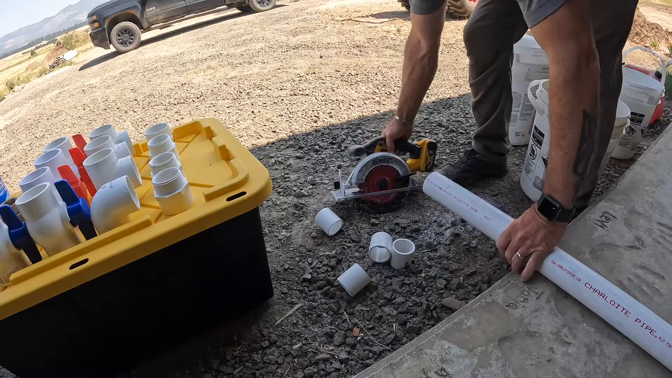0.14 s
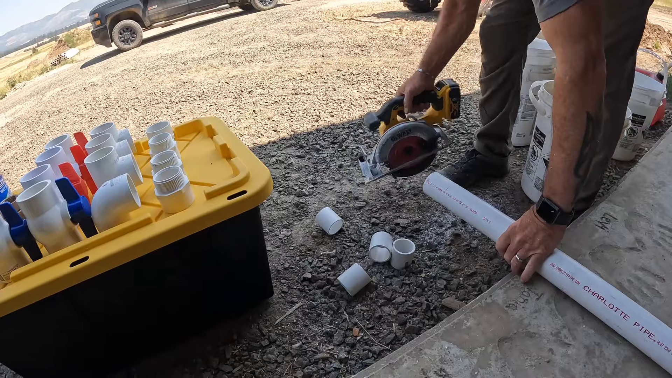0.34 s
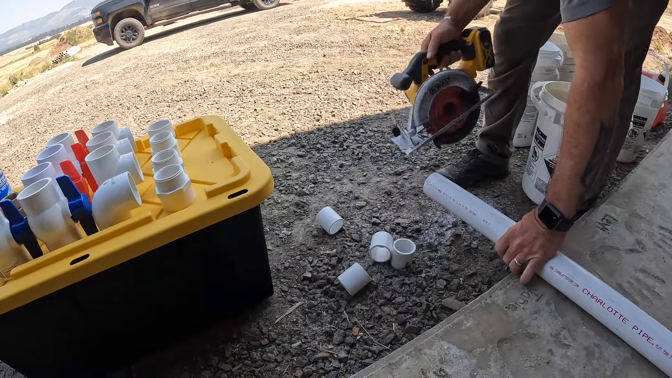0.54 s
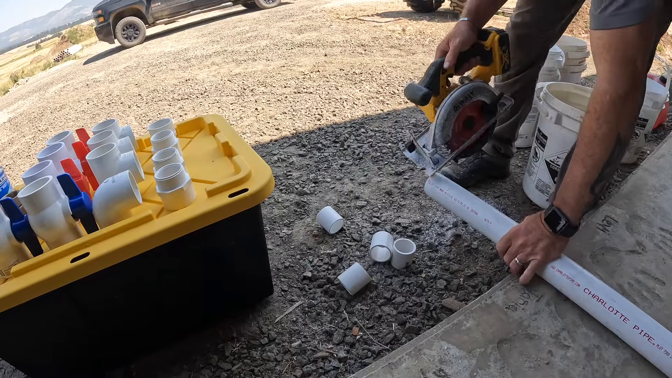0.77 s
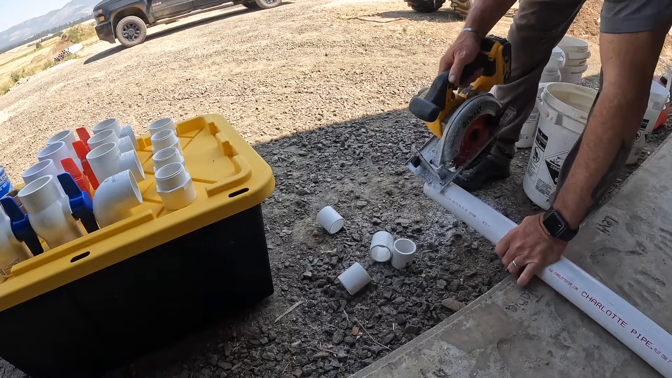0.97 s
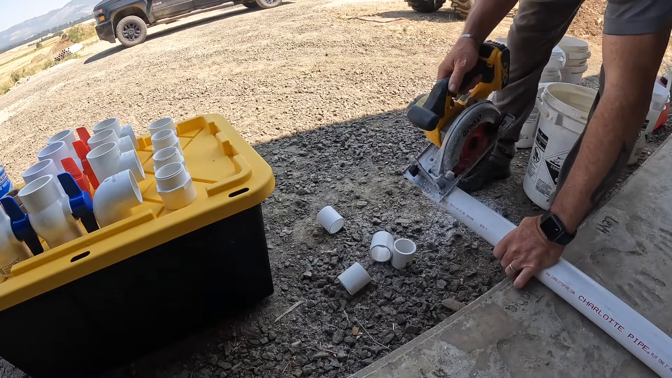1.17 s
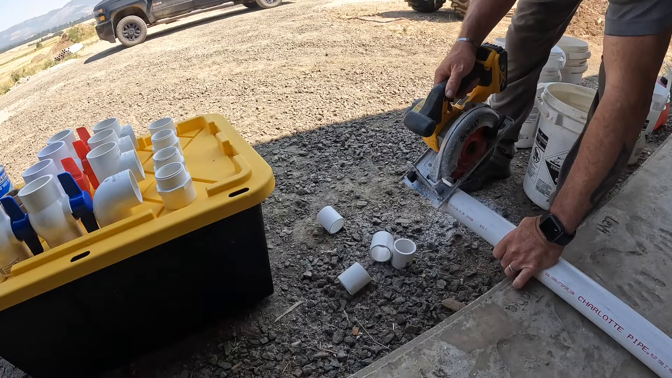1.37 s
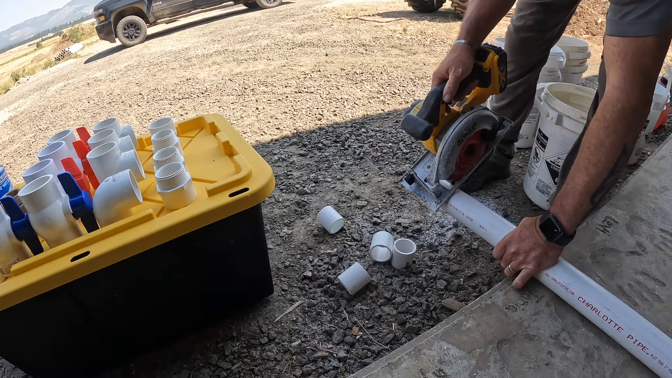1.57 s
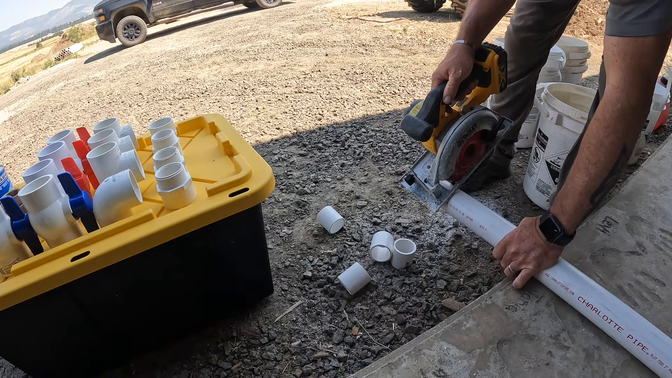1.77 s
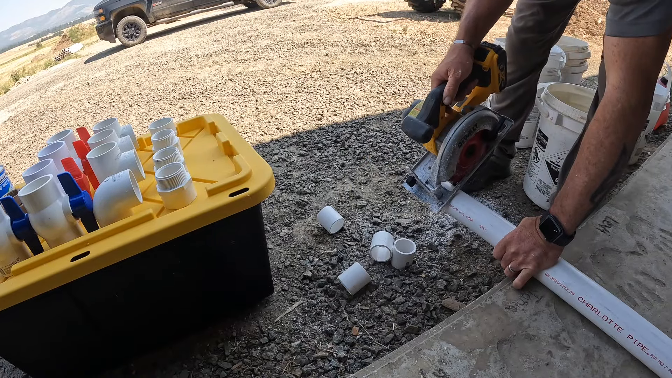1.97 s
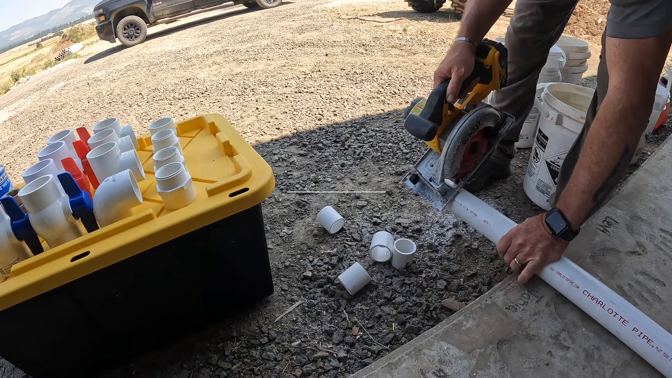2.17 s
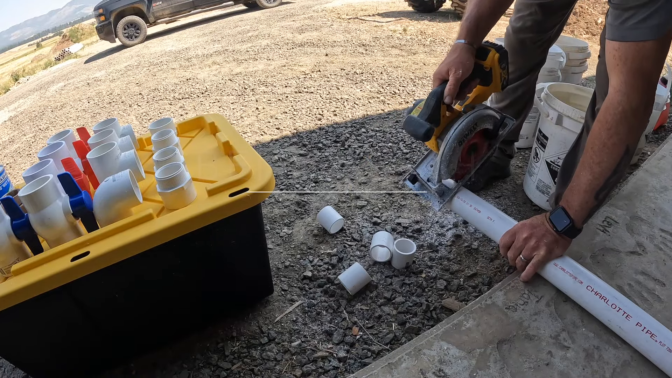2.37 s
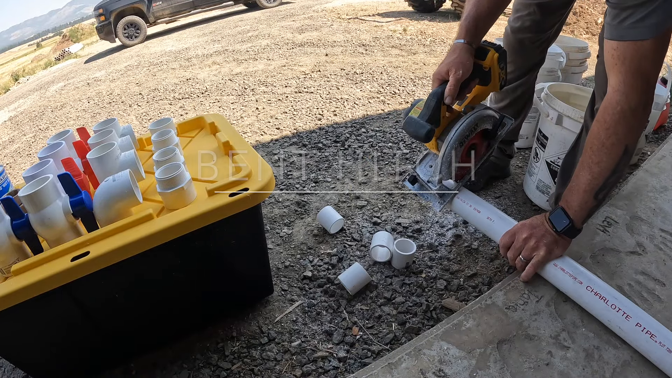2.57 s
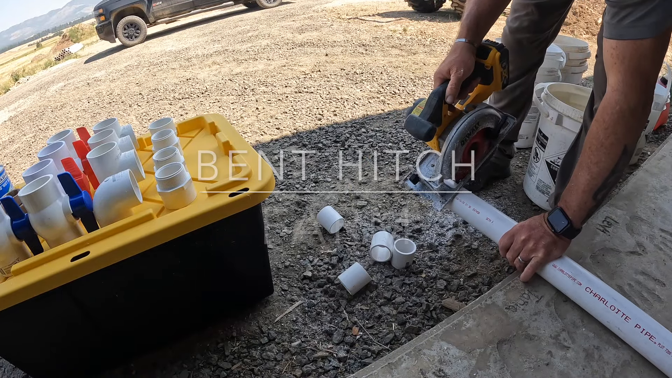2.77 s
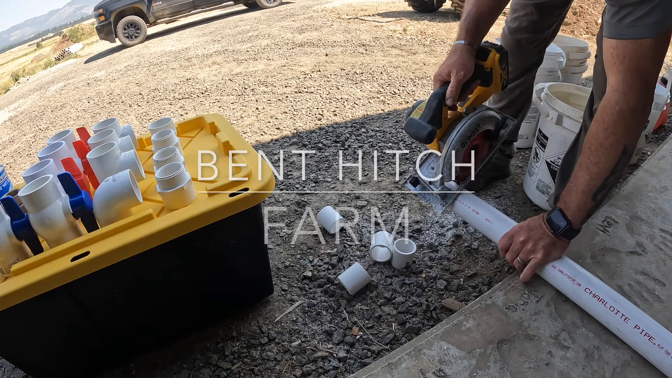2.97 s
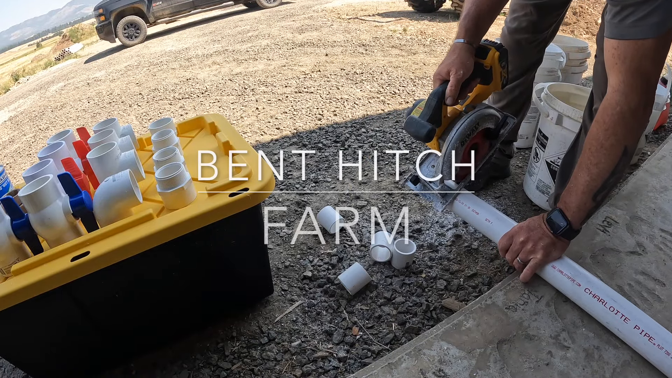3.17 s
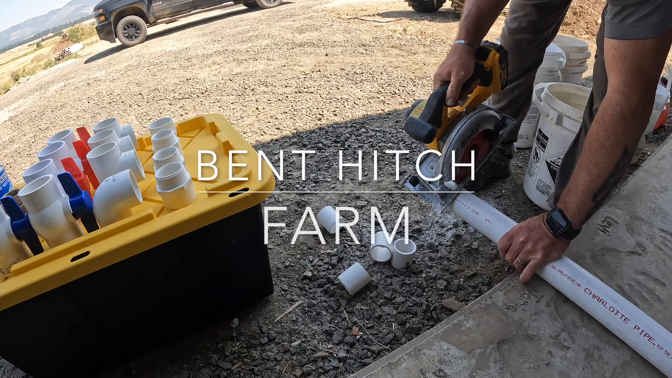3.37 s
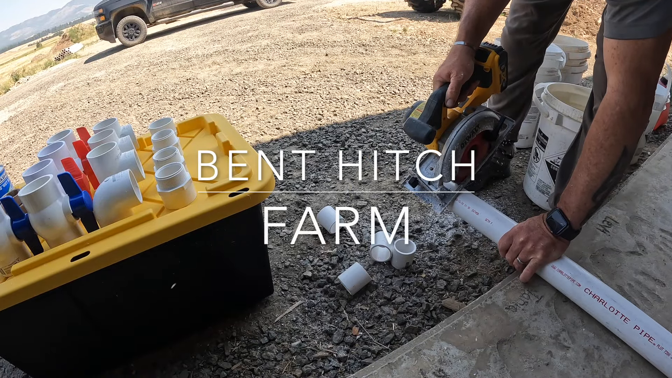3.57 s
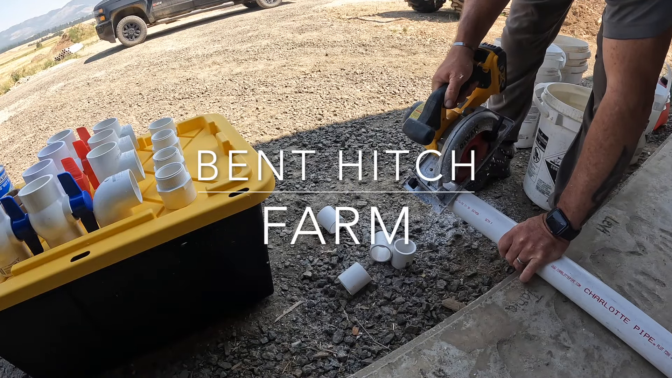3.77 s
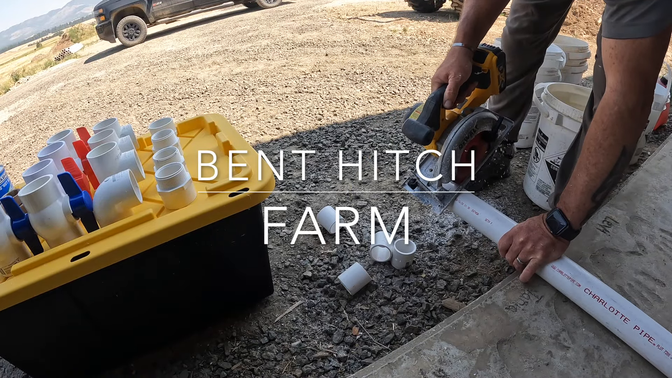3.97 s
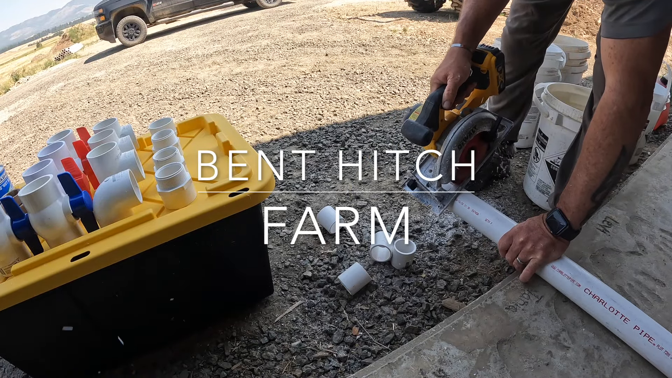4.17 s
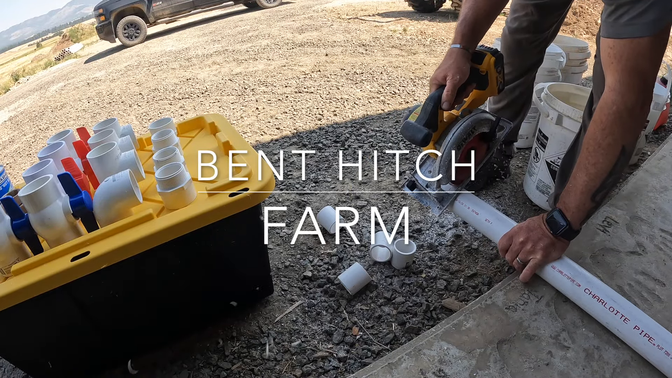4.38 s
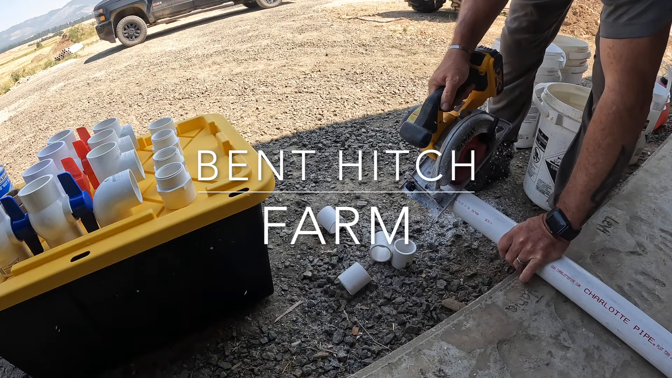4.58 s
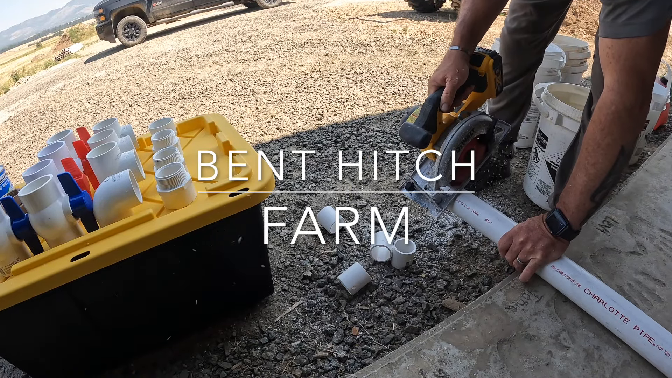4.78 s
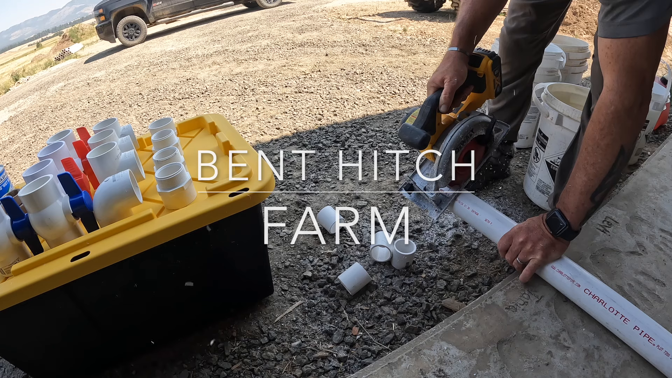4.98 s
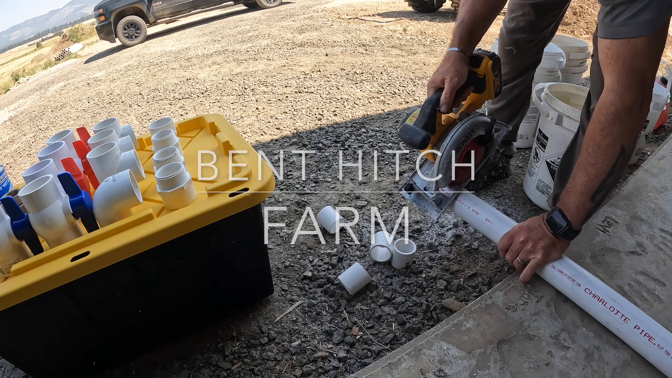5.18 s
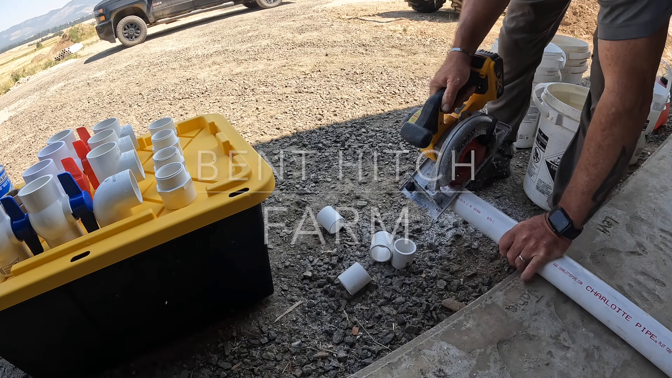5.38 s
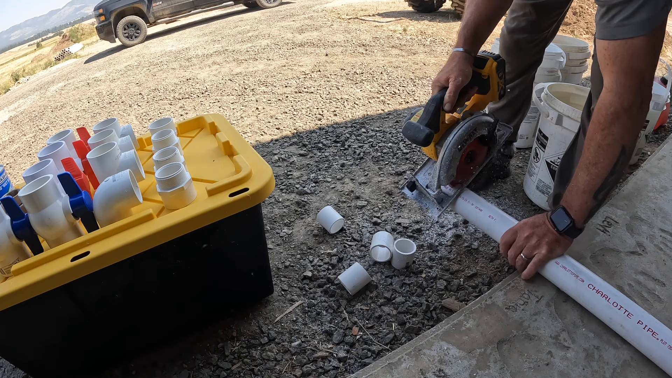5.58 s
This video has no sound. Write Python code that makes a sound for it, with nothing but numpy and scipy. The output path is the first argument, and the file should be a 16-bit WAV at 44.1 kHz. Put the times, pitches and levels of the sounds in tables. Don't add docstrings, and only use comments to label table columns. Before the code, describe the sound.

Close, dry outdoor sound from a small action camera: crunching gravel, hollow pipe taps, a couple of loose-piece nudges and ticks come first. Around three seconds the saw's switch snaps, its motor roars upward and rattles the housing, then the blade chews into plastic, singing and fizzing unevenly until the clip stops. Faint outdoor hum and low wind puffs lie beneath.

```python
import sys
import numpy as np
from scipy import signal
from scipy.fft import rfft, irfft, next_fast_len
from scipy.io import wavfile
from scipy.ndimage import uniform_filter1d

SR = 44100
rng = np.random.default_rng(int(sys.argv[2]) if len(sys.argv) > 2 else 0)


def persist_wave(psi):
    counts = np.round(np.clip(psi, -1, 1) * 32767).astype(np.int16)
    wavfile.write(sys.argv[1], SR, np.atleast_2d(counts).T)


def attenuation_scalar(level_db):
    decades = np.asarray(level_db, float) / 20
    return 10 ** decades


N = 248724
TIME = np.arange(N) / SR
NOTCH_HZ = 9020
BITE_S = 3.743


def evened(x):
    return x / np.sqrt(np.mean(x ** 2) + 1e-20)


def noise():
    return rng.standard_normal(N)


def curves(rows):
    s, *columns = np.transpose(rows)
    return [np.interp(TIME, s, c) for c in columns]


def coloured(x, points):
    f, db = np.transpose(points)
    size = next_fast_len(len(x))
    hz = np.fft.rfftfreq(size, 1 / SR)
    gain = attenuation_scalar(np.interp(np.log(hz + 1), np.log(f), db))
    return irfft(rfft(x, size) * gain, size)[:len(x)]


def split(x, hz, width_hz=300):
    size = next_fast_len(len(x))
    f = np.fft.rfftfreq(size, 1 / SR)
    slope = 1 + np.exp(np.clip(4 * (f - hz) / width_hz, -50, 50))
    low = irfft(rfft(x, size) / slope, size)[:len(x)]
    return low, x - low


def resonate(x, hz, width):
    r = np.exp(-np.pi * width / SR)
    c = r * np.cos(2 * np.pi * hz / SR)
    return 2 * (1 - r) * signal.lfilter([1, -c], [1, -2 * c, r ** 2], x)


def resonate_twice(x, hz, width):
    return resonate(resonate(x, hz, width), hz, width)


def drift(hz):
    steps = rng.standard_normal(N // 64 + 2)
    smooth = signal.lfilter(*signal.butter(N=2, Wn=hz * 128 / SR), steps)
    return np.interp(np.arange(N) / 64, np.arange(len(steps)), evened(smooth))


def grains(per_s, spread_db):
    chance, size, sign = rng.random((N, 3)).T
    heights = attenuation_scalar(-spread_db * np.log(size + 0.00059))
    return evened((chance < per_s / SR) * heights * np.sign(sign - .5))


def with_treble(x, hz, treble_db):
    low, high = split(x, hz)
    return evened(low) + attenuation_scalar(treble_db) * evened(high)


def fade(s0, s1):
    return np.clip((TIME - s0) / (s1 - s0), 0, 1)


def swell(s, db, rise_s, fall_s):
    out = np.zeros(N)
    near = slice(max(int((s - 7 * rise_s) * SR), 0), int((s + 7 * fall_s) * SR))
    t = TIME[near]
    out[near] = attenuation_scalar(db - 10 * np.maximum((s - t) / rise_s, (t - s) / fall_s))
    return out


def passing(hz, mode_hz, width, db):
    return attenuation_scalar(db) / (1 + (2 * (hz - mode_hz) / width) ** 2) ** 2


def depth():
    sink_s = 0.65
    return 1 - np.exp(-np.maximum(TIME - BITE_S, 0) / sink_s)


# (frequency [Hz], level [dB per Hz])
AIR = [(18, -54), (30, -41), (106, -50), (124, -17), (169, -7.5), (203, -5.5), (276, -9.5), (306, 1),
       (367, -10), (513, -11), (4050, -26), (7920, -37), (14300, -45)]


def air():
    return attenuation_scalar(-67.5 + 0.79 * drift(2.7)) * evened(coloured(noise(), AIR))


# (frequency [Hz], level [dB per Hz])
BREEZE = [(20, -13), (70, 10), (100, -3), (140, -27)]
# (time [s], level [dB])
GUSTS = [(0, -93), (.12, -86), (.36, -104), (.88, -102), (.99, -84), (1.06, -98), (1.3, -97), (1.7, -102),
         (2.2, -96), (2.6, -102), (3.4, -94), (3.69, -86), (3.95, -84), (4.05, -80), (4.3, -98), (4.5, -83),
         (4.85, -91), (5.03, -82), (5.25, -90), (5.4, -79), (5.64, -77)]


def breeze():
    return attenuation_scalar(curves(GUSTS)[0] + 1.5 * drift(8.0)) * evened(coloured(noise(), BREEZE))


# (frequency [Hz], level [dB per Hz])
GRAVEL = [(59, -64), (100, -42), (211, -10), (307, -16), (610, -2), (943, -9.5), (1050, -0.5), (1260, -4),
          (1590, -4), (1760, -5.5), (3790, -16.5), (8890, -27), (10700, -36), (14300, -73)]
# (frequency [Hz], level [dB])
STONE_EDGE = [(5800, 0.5), (7500, -10), (9500, -18), (11500, 8)]
# (loudest time [s], level [dB], rise [s per 10 dB], fall [s per 10 dB], treble against level [dB])
SCUFFS = [(0.06, -40, .1, .07, -4), (0.205, -42, .022, .06, -3), (0.25, -44.5, .04, .09, -4),
          (0.44, -53, .09, .23, -7), (0.92, -52, .1, 0.0716, -10.5), (0.998, -56, .005, .04, 12),
          (1.02, -51, 0.0468, .14, -6), (1.53, -70, .12, .03, -6), (1.566, -63, .012, .03, 3),
          (1.584, -55, .009, .035, -8.5), (1.643, -59, .004, .03, -2), (1.665, -59, .03, 0.05, -3),
          (1.98, -50, 0.0519, 0.0761, -9.5), (2.2, -62, 0.17, 0.13, 1), (2.36, -59, .03, .06, -9),
          (2.39, -65, .25, .035, 3), (2.69, -65, 0.07, .3, -4), (2.87, -61.5, 0.16, 0.07, -2),
          (3.03, -56, 0.02, 0.05, -4), (3.06, -58, .01, .2, -4)]


def scuffing():
    powers = np.array([swell(*row[:4]) ** 2 for row in SCUFFS]) + 1e-12
    level = np.sqrt(powers.sum(axis=0))
    treble_db = np.array(SCUFFS)[:, -1] @ powers / level ** 2
    stones = 0.5 * noise()
    for hz in np.geomspace(500, 6000, num=6):
        stones += 0.12 * evened(resonate(grains(300, 2.55), hz, 0.26 * hz))
    crunch = with_treble(coloured(coloured(stones, GRAVEL), STONE_EDGE), 2300, treble_db)
    return level * attenuation_scalar(-1.0 + drift(32.8)) * crunch * (1 - fade(3.1, 3.15))


# (time [s], level [dB])
TICKS = [(0.002, -54), (0.171, -68), (0.3, -69), (0.317, -66), (0.403, -66), (0.422, -70), (0.9955, -39),
         (1.003, -49), (1.119, -60), (1.639, -62), (2.175, -56), (2.746, -56), (3.084, -51)]


def ticking():
    gain = sum(swell(s, db, .0006, .003) for s, db in TICKS)
    return gain * evened(resonate_twice(noise(), 6000, 5500))


def struck(hits, modes):
    out, t = np.zeros(N + 8192), np.arange(8192) / SR
    for s, db in hits:
        ring = 0
        for hz, mode_db, t60 in modes:
            luck_db = 2 * rng.standard_normal()
            ring = ring + attenuation_scalar(mode_db + luck_db - 60 * t / t60) * np.sin(2 * np.pi * hz * t)
        out[round(s * SR):][:8192] += attenuation_scalar(db) * np.minimum(t / .0008, 1) * ring
    return out[:N]


# (frequency [Hz], level [dB], time to die by 60 dB [s])
LONG_PIPE = [(264, -10, .08), (394, -9.5, 0.061), (516, -2, 0.032), (774, -9, 0.032), (1060, -6.5, .03),
             (1433, -4, 0.036), (1550, -10, 0.018), (2930, -20, 0.033)]
# (time [s], peak [dB])
BUMPS = [(1.575, -50), (1.577, -42.5), (1.58, -48), (1.586, -43), (1.591, -51), (1.598, -52), (2.341, -40),
         (2.344, -35.5), (2.35, -39), (2.358, -43.5), (2.373, -47), (2.38, -54), (2.389, -51)]
# (frequency [Hz], level [dB], time to die by 60 dB [s])
CUT_PIECE = [(600, -14, 0.037), (900, -14, .025), (1160, 0.5, 0.092), (1500, -9, .025), (1780, -10, .05),
             (2050, -9, 0.042), (2660, -13, 0.019)]
# (time [s], peak [dB])
NUDGES = [
    (0.499, -48),
    (0.694, -48),
    (0.697, -36.5),
]
# (frequency [Hz], level [dB])
THIN = [(60, -30), (130, -9), (230, 0), (14000, 1.5)]


def pipe_bumps():
    return coloured(struck(BUMPS, LONG_PIPE) + struck(NUDGES, CUT_PIECE), THIN)


# (multiple of the ring [ratio], level [dB])
PIPE = [(0.62, -17.5), (1.001, -6), (1.448, -17), (2.3, -20)]
# (frequency [Hz], level [dB])
KNOCK_COLOUR = [(90, -6), (250, 0), (5500, 1.5), (7500, -7.5), (14000, -19)]
# (time [s], peak [dB], ring [Hz])
TAPS = [(0.009, -27, 1320), (0.17, -39, 1560), (0.178, -23.5, 770), (0.183, -20, 684), (0.203, -26, 604),
        (0.221, -25, 1306), (0.2238, -20.5, 1066), (0.502, -39, 1800), (0.52, -43, 1560),
        (0.551, -49.5, 1490), (0.564, -44.5, 1110), (0.583, -40, 1815), (0.88, -35.5, 860),
        (0.904, -34, 567), (0.915, -36, 600), (0.873, -57, 1340), (0.9, -45, 1440), (0.974, -31, 1700),
        (0.978, -32.5, 1746), (0.981, -36, 2050), (1.048, -34.5, 1160), (1.253, -53, 1630),
        (2.616, -50, 526), (2.796, -44.5, 494)]
# (time [s], peak [dB], ring [Hz], crack
# against peak [dB], thud against peak [dB])
THUMPS = [(0.042, -30.5, 730, -7, -4), (0.059, -26.5, 745, -9, -9), (0.065, -23, 1320, -20, -16),
          (0.069, -26, 1480, -12, -8), (0.317, -44, 1480, -18, -4), (0.449, -38.5, 900, -21, -8.5),
          (0.606, -44, 1770, -23, -11), (0.833, -37, 588, -20, -16), (1.927, -46.5, 1430, -13, -4),
          (1.943, -42, 900, -14, -11), (1.962, -38, 953, -23, -10), (1.995, -37.5, 1640, -11.5, -5),
          (2.54, -54, 599, -19, -15), (3.146, -34, 580, -34, -7)]
# (time [s], peak [dB], ring [Hz], crack against peak [dB])
CLICKS = [(0.092, -23, 900, -18.5), (0.096, -33, 600, -18), (0.129, -28, 900, -23),
          (0.2233, -24.5, 1400, -12), (0.148, -40, 1190, -19), (0.863, -39, 1330, -18),
          (1.033, -35, 900, -14), (1.057, -35, 1110, -17), (1.075, -36.5, 1160, -18),
          (0.367, -45, 1740, -13), (0.402, -43, 2400, -7), (0.421, -44, 1380, -2.5), (0.813, -51, 2270, -3),
          (0.919, -37, 920, -14), (0.991, -21, 876, -10.5), (0.994, -32, 2590, 2), (1.022, -23, 898, -26),
          (1.116, -50, 919, 3), (1.637, -49, 1400, -2.5), (2.174, -37, 600, -11.5), (2.747, -52, 2290, 1.5),
          (2.869, -48, 1380, -4), (3.014, -42, 1860, -10), (3.026, -44, 1110, -13), (3.056, -42, 1130, -9),
          (3.068, -37, 1820, -6), (3.077, -37, 1500, -2), (3.082, -16, 1655, -2), (3.09, -28, 1160, -8),
          (3.097, -38, 1020, -18), (3.103, -38, 1100, -20), (3.115, -22, 1250, -10),
          (3.117, -20.5, 1214, -11.5), (3.123, -25, 1310, -10), (3.128, -23, 1080, -11),
          (0.299, -53, 2570, -8), (0.432, -47, 2930, -1), (0.888, -36, 810, -20),
          (0.933, -32.5, 820, -15.5)]


def knocks():
    rows = [(*row, 0.038, -27, -35) for row in TAPS]
    rows += [(*row[:3], 0.025, *row[3:]) for row in THUMPS]
    rows += [(*row[:3], 0.017, row[3], -42) for row in CLICKS]
    out, t = np.zeros(N + 4096), np.arange(4096) / SR
    slow_decay = attenuation_scalar(-60 * t / 0.096)
    crack_decay = attenuation_scalar(-60 * t / 0.0069) + attenuation_scalar(-16.0 - 60 * t / 0.1)
    for s, db, hz, t60, crack_db, thud_db in rows:
        a, b = rng.standard_normal((2, 4096))
        dying = attenuation_scalar(-60 * t / t60) + attenuation_scalar(-22.5 - 60 * t / (8.0 * t60))
        ring = sum(attenuation_scalar(d) * dying ** (k ** .5) * np.sin(2 * np.pi * hz * k * t) for k, d in PIPE)
        ring *= 1 + .25 * evened(uniform_filter1d(a, 60))
        thud = attenuation_scalar(thud_db - 7.5) * slow_decay * evened(resonate_twice(b, 320, 280))
        crack = 1.09 * resonate(resonate(a, 3950, 3540), 3300, 3440) * crack_decay
        rattle = attenuation_scalar(-19.5) * slow_decay * evened(coloured(b, GRAVEL))
        body = np.minimum(t / 0.0009, 1) * (ring + thud)
        at = round((s + .0015) * SR)
        out[at:at + 4096] += attenuation_scalar(db + 3) * (body + attenuation_scalar(crack_db + 3) * crack + rattle)
    return coloured(out[:N], KNOCK_COLOUR)


# (time [s], speed lost [turns per s])
SAG = [
    (3.8, 0),
    (4.2, 7),
    (4.6, 12),
    (5.2, 7),
    (5.64, 6),
]


def rotor():
    switch_s, spin_up_s, free_speed, crawl = 3.127, .168, 370, 20
    free = free_speed * (1 - np.exp(-np.maximum(TIME - switch_s, 0) / spin_up_s))
    return np.maximum(free, crawl) - curves(SAG)[0]


# (time [s], level [dB], ring [Hz])
HOUSING_BURSTS = [(3.149, -33.5, 1155), (3.165, -28.5, 1260), (3.173, -32, 817), (3.186, -36, 3500),
                  (3.255, -33.5, 845), (3.279, -42, 5909), (3.298, -39, 4250), (3.33, -36, 4616),
                  (3.385, -26.5, 2570), (3.325, -33.5, 790), (3.405, -36, 800), (3.715, -34, 4300)]


def housing_bursts(rattle):
    out = np.zeros(N)
    for s, db, hz in HOUSING_BURSTS:
        out += swell(s, db, .008, .03) * evened(resonate_twice(rattle, hz, 50 + hz / 20))
    return out


# (frequency [Hz], width [Hz], level [dB])
HANDLE = [
    (191, 33, -49),
    (293, 68, -39.5),
    (358.2, 100, -43.5),
]
# (frequency [Hz], level [dB per Hz])
SHAKE_COLOUR = [(18, -73), (30, -60), (130, -23), (273, -6), (313, -7.5), (358, -16), (409, -7.5),
                (605, -7), (750, 0), (980, -7.5), (1650, -120)]


def handle_hum(speed, turns, rattle):
    damped_db = -9.5 * fade(BITE_S, BITE_S + 0.06) - 6 * np.maximum(TIME - BITE_S, 0)
    hum = sum(passing(speed, *mode) for mode in HANDLE) * np.sin(2 * np.pi * turns)
    hum += attenuation_scalar(5.0) * passing(speed, *HANDLE[0]) * np.sin(4 * np.pi * turns)
    hum *= attenuation_scalar(damped_db + 1.5 + 1.5 * drift(5.4)) * np.minimum(speed / 150, 1) ** 3
    shake_gain = np.minimum(speed / 160, 1) * attenuation_scalar(-47.5 - 9 * depth())
    shake = shake_gain * evened(coloured(rattle, SHAKE_COLOUR))
    return (hum + shake) * fade(3.12, 3.15)


# (frequency [Hz], level [dB per Hz])
HOUSING = [(24, -87), (40, -73), (241, -29), (316, -6), (543, -15.5), (786, -8), (1170, -5), (1290, -8),
           (1420, -3), (2970, 1), (3800, -5), (6060, -10), (8770, -25), (11200, -28), (13000, -39),
           (14300, -60)]
# (frequency [Hz], width [Hz], level [dB])
HOUSING_MODES = [(797, 45, -12), (1310, 49, -1), (1550, 100, -5), (2078, 21, 3.5), (2340, 110, 1.5),
                 (2570, 41, -7), (2890, 22, 2), (3200, 63, -4), (3390, 135, -4), (4250, 180, -3.5),
                 (4616, 110, -8), (5040, 35, -10), (5909, 67, -2), (7000, 37, -15)]
# (multiple of turn rate [ratio], level [dB], speed where it sets in [turns per s])
POLE_ORDERS = [(9, 0, 60), (18, -5, 225), (27, -10, 212)]


def motor_roar(speed, turns, rattle):
    rung = np.zeros(N)
    for hz, width, db in HOUSING_MODES:
        mode = evened(resonate(resonate(rattle, hz, width), hz, 3 * width))
        rung += attenuation_scalar(db + 4.3 * drift(26.0)) * mode * (width / 60) ** .5
    roar = split(evened(coloured(rattle, HOUSING)) + attenuation_scalar(-5.5) * evened(rung), 700)[1]
    fan = attenuation_scalar(-4.0) * drift(326) * np.sin(2 * np.pi * POLE_ORDERS[0][0] * turns)
    roar = roar + fan * fade(3.2, 3.38)
    roar = with_treble(roar, NOTCH_HZ, -25 - 0.0175 * speed)
    running = fade(3.113, 3.12) * (1 - fade(3.7, 3.72))
    return np.minimum(speed / 155, 1) * attenuation_scalar(-25 + 0.68 * drift(34.0)) * roar * running


# (frequency [Hz], width [Hz], level [dB])
GEAR_CASE = (3100, 560, -36)


def motor_whine(speed, turns):
    def order(k):
        return attenuation_scalar(3.2 * drift(50)) * np.sin(2 * np.pi * k * turns + .3 * drift(70))

    pole_db = -33.5 + 0.0091 * speed - 26 / (1 + np.exp((281 - speed) / 9))
    poles = np.zeros(N)
    for k, db, sets_in in POLE_ORDERS:
        poles += attenuation_scalar(db) * np.clip(speed / sets_in, 0, 1) ** 6 * order(k)
    gear_order = 13
    gear = attenuation_scalar(np.maximum(-8 - 0.2941 * speed, -52)) + passing(gear_order * speed, *GEAR_CASE)
    gear *= attenuation_scalar(1.0 - 10.0 * depth())
    whine = attenuation_scalar(pole_db) * poles + gear * order(gear_order)
    housing = sum(resonate(whine, hz, 1.1 * width) for hz, width, db in HOUSING_MODES)
    return (0.95 * whine + 1.75 * housing) * fade(3.15, 3.175)


def motor(speed):
    turns = np.cumsum(speed) / SR
    rattle = .5 * grains(4000, 2) + .8 * noise()
    sound = motor_roar(speed, turns, rattle) + motor_whine(speed, turns)
    return sound + handle_hum(speed, turns, rattle) + housing_bursts(rattle)


# (frequency [Hz], level [dB per Hz])
TEARING = [(18, -92), (30, -52.5), (358, -32), (615, -42), (817, -14), (1060, -20.5), (1480, -2.5),
           (1820, -13), (3130, -8.5), (3560, -10), (5960, -13), (9010, -31), (10800, -24), (12900, -30),
           (14300, -58.5)]
# (frequency [Hz], width [Hz], level [dB])
PIPE_WALL = [(1560, 98, -21), (1790, 81, -3), (2290, 100, -7), (2580, 68, -3.5), (3044, 550, 4.5),
             (3370, 450, -5), (3846, 116, 7.5), (4260, 560, 1), (4650, 380, 3.5), (5050, 670, -2)]


def tearing_plastic(bites, fizz_db):
    wall = np.zeros(N)
    for hz, width, db in PIPE_WALL:
        wall += attenuation_scalar(db + 2.1 * drift(3.5)) * resonate_twice(bites, hz, width)
    torn = split(evened(coloured(bites, TEARING)) + attenuation_scalar(-10) * evened(wall), 630)[1]
    return with_treble(torn, NOTCH_HZ, fizz_db + 2.0)


# (frequency [Hz], level [dB])
BLADE = [(818.3, -56.5), (990.5, -61.5), (1120, -59), (1652, -65.5), (1725, -49), (2196, -54), (2245, -65),
         (2315, -53), (2460, -52), (2627, -56), (2805, -46.5), (2875, -47), (3012, -48), (3155, -51),
         (3365, -45.5), (3575, -51.5), (3790, -47), (4140, -50), (4350, -44.5), (4786, -48.5), (5394, -53),
         (5771, -52), (5938, -86), (6083, -66), (6428, -51), (7020, -51.5)]


def blade_shimmer(bites):
    out = np.zeros(N)
    for hz, db in BLADE:
        width = 7 + hz / 500
        mode = resonate(resonate(bites, hz, width), hz, 47.0) / width ** .5
        out += attenuation_scalar(db + 2.0 * drift(11.0) - hz / 1500) * mode
    return out


def singing(hz, db, bites):
    phase = 2 * np.pi * np.cumsum(hz + 0 * TIME) / SR + 0.58 * drift(9.4)
    tone = attenuation_scalar(1.6 * drift(5.5)) * np.sin(phase)
    skirt = evened(resonate_twice(bites, np.mean(hz), 32.0))
    return attenuation_scalar(db) * (tone + 0.24 * skirt)


def kicked(rows, held_db):
    kicks = sum(swell(s, db, 0.056, 0.066) ** 2 for s, db in rows)
    return np.sqrt(attenuation_scalar(2 * held_db) + kicks)


# (time [s], frequency [Hz])
LOW_BEND = [(3.74, 1347), (3.9, 1350), (4.03, 1362), (4.27, 1337), (4.4, 1350), (4.95, 1343), (5.3, 1350),
            (5.64, 1350)]
# (time [s], level [dB])
LOW_KICKS = [(3.76, -23.5), (3.89, -36), (4.07, -30), (4.19, -26), (4.36, -33), (4.49, -32.5), (4.61, -32),
             (4.7, -30.5), (4.89, -29.5), (5.02, -31.5), (5.11, -31), (5.18, -35), (5.3, -35), (5.41, -35)]
# (time [s], level [dB])
SIDE_KICKS = [(3.75, -40), (4.15, -34), (4.22, -32.5), (4.34, -34), (4.55, -50), (4.68, -40), (4.82, -39),
              (4.96, -30.5), (5.08, -34), (5.2, -38), (5.42, -37), (5.55, -47)]
# (time [s], frequency [Hz])
SECOND_BEND = [(3.74, 1497), (3.95, 1510), (4.3, 1510), (4.5, 1525), (4.85, 1520), (5.05, 1506),
               (5.25, 1503), (5.4, 1516), (5.64, 1512)]
# (time [s], level [dB])
SECOND_KICKS = [(3.77, -27.5), (3.86, -22), (3.95, -25), (4.07, -26.5), (4.29, -35), (4.37, -46),
                (4.49, -32), (4.6, -29.5), (4.73, -31.5), (4.82, -35), (4.91, -33.5), (5.09, -29),
                (5.22, -30), (5.35, -28), (5.48, -30.5), (5.58, -34)]
# (time [s], frequency [Hz], level [dB])
THIRD = [(3.76, 1940, -47), (4.1, 1970, -42), (4.18, 1990, -36), (4.3, 1992, -34), (4.48, 1957, -38),
         (4.7, 1993, -38.5), (4.87, 1976, -43), (5.04, 1965, -30), (5.09, 2010, -46), (5.26, 1980, -33.5),
         (5.36, 1978, -53), (5.64, 1958, -41)]
# (time [s], frequency [Hz], level [dB])
FOURTH = [(3.75, 3140, -39), (3.85, 3146, -29), (3.91, 3164, -43), (4.02, 3156, -31), (4.2, 3160, -40),
          (4.36, 3160, -42), (4.44, 3152, -23), (4.5, 3186, -35), (4.64, 3142, -45), (4.7, 3142, -28),
          (4.76, 3160, -40), (4.82, 3165, -29), (4.95, 3160, -45), (5.11, 3146, -33), (5.17, 3150, -48),
          (5.22, 3145, -42), (5.43, 3158, -31), (5.64, 3120, -44)]


def singing_blade(bites, spin):
    low_hz, second_hz = curves(LOW_BEND)[0], curves(SECOND_BEND)[0]
    low = kicked(LOW_KICKS, -54) * evened(singing(low_hz, 0, bites))
    side = kicked(SIDE_KICKS, -43.5) * evened(singing(low_hz + spin, 0, bites))
    pair = singing(second_hz, 0, bites) + singing(second_hz + spin, -26.5, bites)
    second = attenuation_scalar(0.6) * kicked(SECOND_KICKS, -37) * evened(pair)
    third = singing(*curves(THIRD), bites)
    fourth = attenuation_scalar(-1.5) * singing(*curves(FOURTH), bites)
    return low + side + second + third + fourth


# (time [s], level [dB])
FEED = [
    (3.74, -28.5),
    (3.754, -30.5),
    (3.818, -27.5),
    (3.872, -30),
    (4.046, -24),
    (4.068, -27.5),
    (4.432, -24.5),
    (5.194, -26),
    (5.64, -24.5),
]
# (time [s], level [dB], rise [s per 10 dB], fall [s per 10 dB])
FIRST_BITE = (3.5, -22, 1.65, 0.23)
# (time [s], extra level [dB], rise [s per 10 dB], fall [s per 10 dB])
BITE_FIZZ = (3.712, 0, .02, 0.1)
# (time [s], extra level [dB])
SNAG = [(3.75, 1.5), (3.83, 2), (3.89, -2), (4.04, 3), (4.09, 0), (4.23, -1), (4.3, 1), (4.42, 3),
        (4.62, 1.5), (4.77, -1), (4.82, 1), (4.92, -2), (5.07, 1), (5.13, -3.5), (5.55, 2), (5.64, -0.5)]


def cutting(speed):
    feed_db = curves(FEED)[0] + 25
    tear = np.hypot(attenuation_scalar(-25 + 0.41 * feed_db), swell(*FIRST_BITE))
    fizz_db = -19 + 0.45 * feed_db - 3.5 * (1 - depth()) + 5.5 * swell(*BITE_FIZZ)
    spin = 7 / 36 * speed
    turns = np.cumsum(spin) / SR
    wobble = 1 + 0.11 * np.cos(2 * np.pi * turns) + 0.17 * np.cos(6 * np.pi * turns)
    bites = wobble * (.5 * grains(5000, 1.3) + 0.58 * noise()) * attenuation_scalar(0.84 * drift(22.0))
    torn = attenuation_scalar(-0.81) * tearing_plastic(bites, fizz_db)
    dull, bright = split(torn + attenuation_scalar(-8.0) * evened(blade_shimmer(bites)), 3060)
    sound = tear * (dull + attenuation_scalar(1.63 * (fizz_db + 20.5)) * bright)
    sound += (attenuation_scalar(curves(SNAG)[0]) - 1) * resonate(sound, 2940, 400)
    return (sound + singing_blade(bites, spin)) * fade(3.695, 3.72)


def scene():
    speed = rotor() * (1 + 0.0016 * drift(9.9))
    handling = scuffing() + ticking() + pipe_bumps() + knocks()
    return np.tile(air() + handling + motor(speed) + cutting(speed), (2, 1))


def roll_off(x):
    return signal.sosfilt(signal.butter(12, 14491, fs=SR, output="sos"), x)


def record(dry):
    mono = dry[0]
    for sharpness in (12, 30, 45):
        mono = signal.lfilter(*signal.iirnotch(NOTCH_HZ, sharpness, SR), mono)
    mono = .4 * np.tanh(mono / .4)
    mono = signal.sosfilt(signal.butter(N=4, Wn=115, btype="high", fs=SR, output="sos"), mono)
    mono = mono + breeze()
    low, high = split(mono, 11520, 470)
    turned = signal.hilbert(high, next_fast_len(N))[:N] * np.exp(1.6j * drift(130))
    other = split(turned.real, 8200)[1]
    bass_side = (attenuation_scalar(-28) * split(mono, 820, 870)[0] + attenuation_scalar(-44.0) * mono) * drift(31.0)
    first = low + attenuation_scalar(-2.0) * high + bass_side
    second = low + attenuation_scalar(1.86) * (other - 0.31 * high) - bass_side
    return roll_off(np.array([first, second]))


dry = scene()
out = record(dry)
persist_wave(out)
```